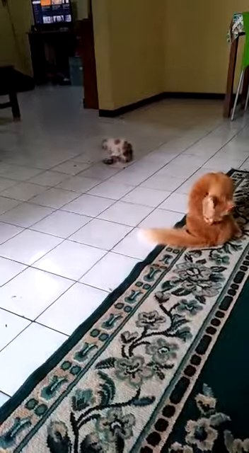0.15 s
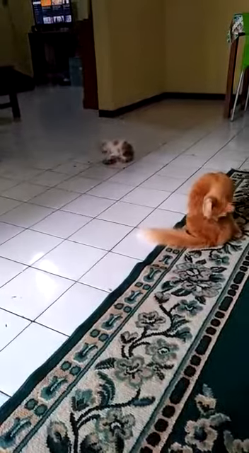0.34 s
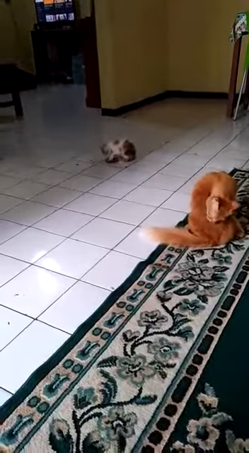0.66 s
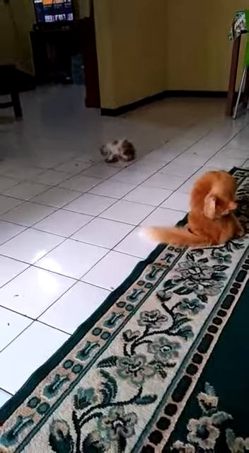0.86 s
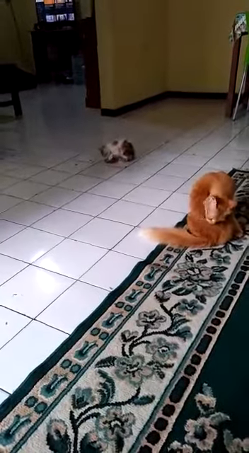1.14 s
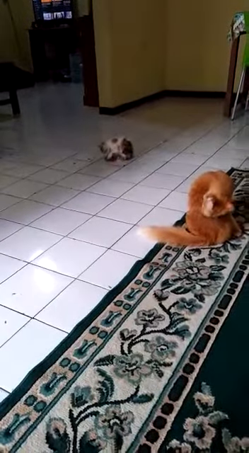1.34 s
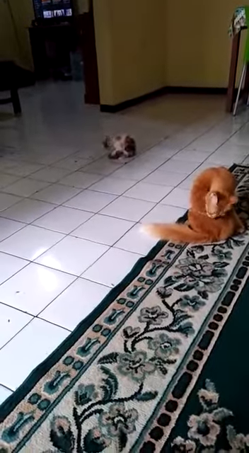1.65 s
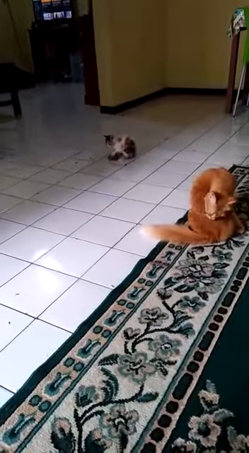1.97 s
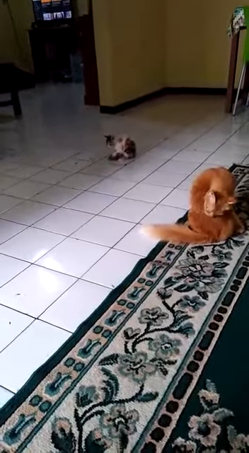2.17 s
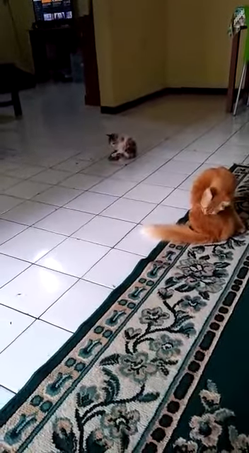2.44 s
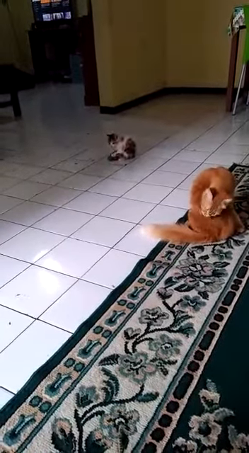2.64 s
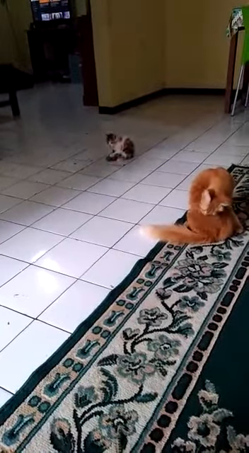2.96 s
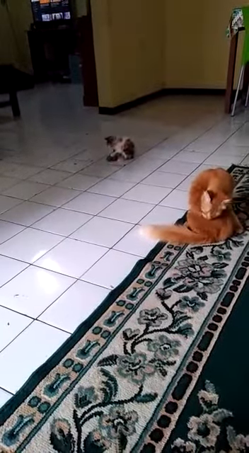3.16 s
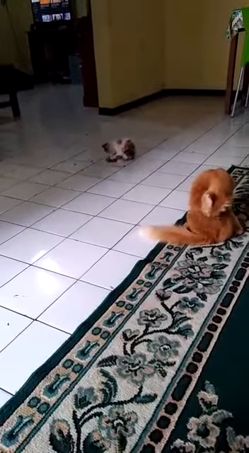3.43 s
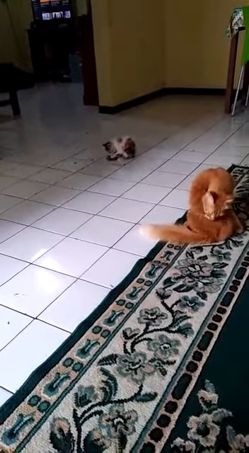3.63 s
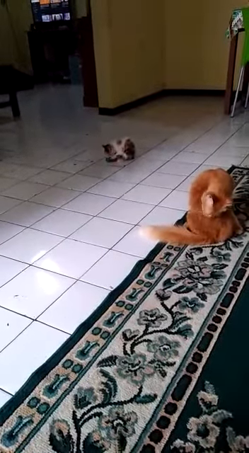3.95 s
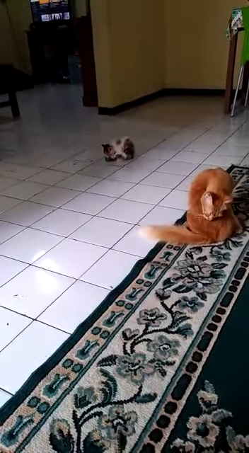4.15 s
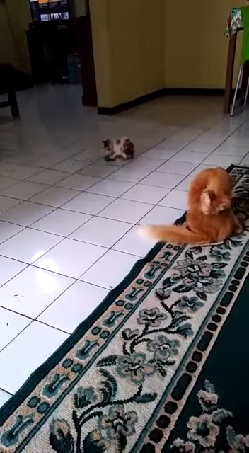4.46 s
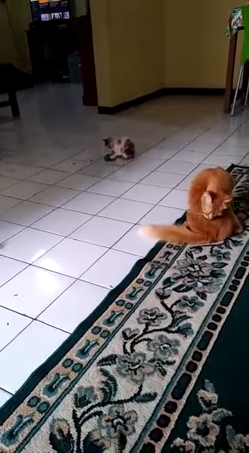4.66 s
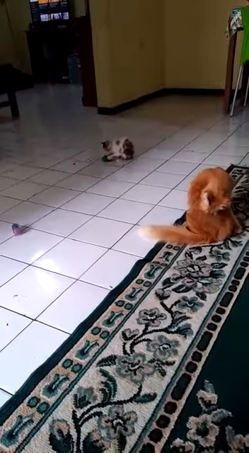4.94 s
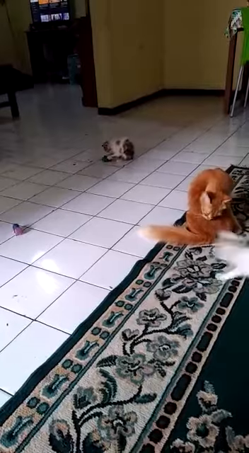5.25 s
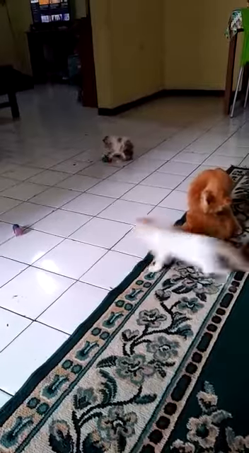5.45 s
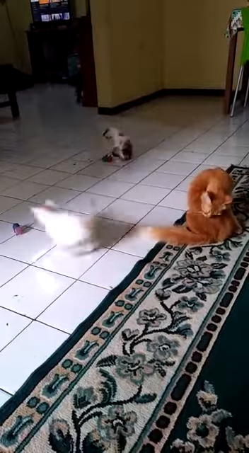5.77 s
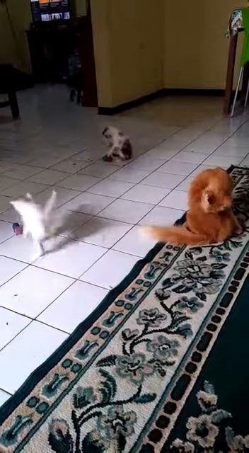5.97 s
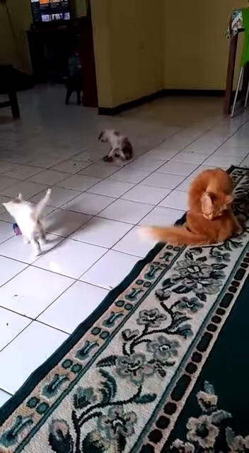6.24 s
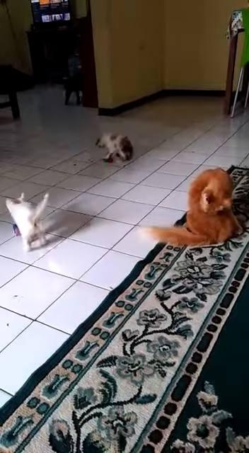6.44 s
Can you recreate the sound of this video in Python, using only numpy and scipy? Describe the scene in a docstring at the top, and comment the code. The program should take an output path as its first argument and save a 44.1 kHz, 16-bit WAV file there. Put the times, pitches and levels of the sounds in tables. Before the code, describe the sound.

A small plastic toy clicks like a ratchet about six times a second in an echoing tiled room, then rolls, jolting over grout lines, and stops.

```python
"""Tiled, echoing room: a small plastic toy car's ratchet clicks about six times a second, each click a
tick and clatter ringing broad body modes. It then rolls off, rubbing the tile and jolting over grout
lines; a paw scuffs it (swelling rubs), and a few faint rings sound. Low noise, a hum and room modes
rumble throughout. A suppressor lowers faint treble, so the echoes end early; steady hiss lies on top."""
import sys
import numpy as np
from scipy import signal
from scipy.fft import rfft, irfft
from scipy.io import wavfile
from scipy.ndimage import uniform_filter1d

SR = 44100
rng = np.random.default_rng(int(sys.argv[2]) if len(sys.argv) > 2 else 0)


def dump(signal):
    """Clip the signal to [-1, 1] and save it as 16-bit WAV at the path in sys.argv[1]."""
    limited = np.clip(np.atleast_2d(signal).T, -1, 1)
    pcm = np.round(limited * 32767).astype(np.int16)
    wavfile.write(sys.argv[1], SR, pcm)


N = 291060

# car body modes, in order thud, hollow, shell, edge, bright, top: (centre [Hz], width [Hz])
BODY_MODES = [(880, 714), (1750, 1253), (2900, 1136), (5100, 1560), (9200, 2500), (13000, 1300)]
# echo decay of each body mode: (time to fall 60 dB [s])
ECHO_T60_S = [0.36, 0.4, 0.37, 0.41, 0.34, 0.26]

# ratchet clicks: (time [s], peak [dB], hollow over bright [dB], shell [Hz], edge [Hz], echo over blow [dB])
CLICKS = [(0.4119, -49.5, -30.5, 3230, 3880, 7), (0.4275, -22, -15.5, 2570, 5730, 5.5),
          (0.5882, -30, -20, 2880, 6100, -5.5), (0.599, -38, -10.5, 3200, 5850, 9),
          (0.706, -35.5, -19.5, 2940, 6800, 0), (0.7204, -47, -34, 2670, 5880, 3),
          (0.9177, -56, -4, 2340, 5970, -0.5), (1.2095, -33, -13.5, 2950, 4700, 12.5),
          (1.3763, -22, -17.5, 2760, 4800, 1), (1.5451, -20.5, -14.5, 2620, 5700, 3.5),
          (1.6946, -18, -13.5, 3300, 4240, 3.5), (1.8662, -25, -15, 2660, 4700, 3),
          (2.0279, -31, -19.5, 3250, 5140, 1), (2.1888, -33.5, -18.5, 3480, 4070, 3.5),
          (2.3474, -29.5, -13, 3440, 4080, 7), (2.5086, -30, -18.5, 3310, 5750, 4),
          (2.637, -41.5, -34, 3400, 3670, -1), (2.7849, -34.5, -16.5, 2780, 4740, 9.5),
          (2.927, -24, -11, 2440, 5700, 3), (3.0959, -21.5, -9.5, 2460, 6530, 0.5),
          (3.2615, -21.5, -20.5, 2720, 5960, 1.5), (3.421, -20, -19, 2570, 6200, 3.5),
          (3.5626, -21, -12.5, 2900, 5900, -0.5), (4.0702, -32, -15, 2900, 5100, 10.5),
          (4.1227, -28.5, -11, 2490, 5170, 6), (6.2225, -60.5, -15.5, 3180, 5870, -6),
          (6.2602, -52.5, -5.5, 3040, 5090, 7)]
SHELL_DB, EDGE_DB, TOP_DB = -8, -11, -6  # modes over bright, for a click at HARD_DB
HARD_DB = -25
SOFT_SHELL, SOFT_EDGE, SOFT_TOP = 0.099, 0.12, -0.067  # dB gained per dB softer than HARD_DB
CLATTER_MIN, CLATTER_SPREAD = .42, .5  # loose-part taps against the first tick, before they die down

# wheels jolting over grout lines close by: (time [s], peak [dB], shell over bright [dB])
JOLTS = [(4.2092, -28.3, -11), (4.2154, -26.3, -14), (4.2274, -27.0, -18), (4.2526, -23.4, -13),
         (4.2577, -26.7, -19), (4.2771, -21.2, -11), (4.2821, -26.7, -10), (4.3349, -25.1, -10),
         (4.3539, -17.7, -14), (4.3577, -20.7, -14), (4.3675, -24.7, -8), (4.4086, -29.7, -3),
         (4.4367, -16.9, -9), (4.4402, -18.2, -18), (4.5353, -24.6, -19), (4.5385, -16.2, -10),
         (4.5496, -18, -26), (4.6536, -26.8, -17), (4.7966, -27.7, -9), (4.82, -31.8, -12)]
JOLT_SHELL_HZ, JOLT_DECAY_S = (2550, 3450), (.0007, .0022)  # random ranges
SMALL_JOLT_SPAN_S, SMALL_JOLT_OVER_ROLL_DB, SMALL_JOLT_SHELL_DB = (4.14, 4.96), 17, -6

# wheels rubbing the tile: (time [s], bright mode [dB], shell mode [dB])
ROLL = [(4.118, -81, -89), (4.132, -44.5, -51.5), (4.3, -50.5, -48), (4.47, -44.5, -59), (4.55, -55.5, -49),
        (4.62, -57, -57), (4.7, -56, -57), (4.77, -63.5, -65.5), (4.81, -54, -55.5), (5.0, -63, -58.5),
        (5.05, -72, -66.5), (5.161, -88, -87.5)]
# edge mode of the roll: (time [s], level over bright [dB])
ROLL_EDGE = [(4.118, -6.5), (4.3, -5.5), (4.5, -20), (4.62, -5), (4.72, 3), (4.85, -3), (5.0, -8.5),
             (5.16, -14)]
ROLL_HOLLOW_DB, ROLL_TOP_DB = -8.5, -7  # over bright at the start
ROLL_HOLLOW_FADE_DB_PER_S, ROLL_TOP_FADE_DB_PER_S = -11, -7.5  # against bright, as the car slows
ROLL_SHELL_MODE = 2950, 800  # centre, width [Hz]
RUB_BRIGHT_MODE = 8700, 2600  # centre, width [Hz]; roll and scuffs

# fur and claws on plastic and tile: (loudest time [s], rise [s], fall [s], bright [dB], shell over bright [dB])
SCUFFS = [(0.005, 0.0059, 0.061, -75, -14), (5.645, 0.022, 0.13, -66, -1), (6.05, 0.056, .05, -80, -16),
          (6.301, 0.086, 0.09, -65, 5.5), (6.571, 0.048, .3, -69, -8.5)]
SCUFF_ENDS_DB = -22.5  # ends against the top
SCUFF_HOLD = 0.17  # share of rise and fall spent at the top
SCUFF_HOLLOW_DB, SCUFF_EDGE_DB, SCUFF_TOP_DB = -11.5, -5.5, -6.5  # hollow, edge over shell; top over bright

# faint rings: (time [s], starting level [dB], centre [Hz], time to fall 60 dB [s], width [Hz])
PINGS = [(.273, -61, 1400, 0.28, 460), (.43, -49.5, 1630, 0.64, 220), (5.588, -67, 1940, 0.67, 240),
         (6.09, -77, 1980, 1.4, 66), (6.55, -67, 8900, 2.0, 300)]

# spectrum of the wide low noise: (frequency [Hz], relative density [dB])
RUMBLE_SPECTRUM = [(15, -38), (25, -12), (91, -13), (176, -8), (213, -45.5), (275, -11.5), (313, -34),
                   (468, -21.5), (644, -31), (747, -23.5), (1640, -30), (1940, -28), (4000, -54.5),
                   (5200, -79), (8800, -120)]
RUMBLE_RMS_DB = -72
# rumble above 350 Hz: (time [s], relative level [dB])
MID_SWELL = [(0, 5.5), (.4, 8), (0.8, 2), (2.2, 1), (2.4, 7.5), (2.8, 2), (6.6, 3)]
# hum and narrow room modes before the throb: (time [s], hum peak [dB], modes rms [dB])
BOOM = [(0.0, -59.5, -73), (0.24, -74, -77.5), (0.37, -57, -82.5), (0.59, -57, -77.5), (0.97, -73.5, -86.5),
        (1.36, -102, -68.5), (1.63, -88.5, -99), (1.91, -65, -77.5), (2.08, -75, -83.5), (2.52, -61, -70.5),
        (2.65, -75, -76.5), (2.85, -59, -73.5), (3.12, -65, -60), (3.64, -68.5, -71), (3.9, -64, -66),
        (4.58, -68.5, -83), (4.7, -63.5, -65.5), (5.07, -70, -69.5), (5.24, -56.5, -68.5), (5.39, -67, -88),
        (5.66, -65, -75), (6.6, -67, -96)]
HUM_HZ = 65
OCTAVE_DB = 3.5  # peak of the hum's octave over the narrow modes' level
# room modes, in order wide thudding, narrow, top: (centre [Hz], width [Hz])
ROOM_MODES = [(98, 85), (160, 16), (300, 40)]
THUD_FROM_HUM_DB, THUD_FROM_MODES_DB = -12.5, -4  # the wide mode rides on both
THUD_LATE_DB, LATE_S = -75, 5.2  # a steady share fades in from LATE_S
TOP_ROOM_MODE_DB = -10.5  # over the narrow mode

# hiss spectrum: (frequency [Hz], relative density [dB])
HISS_SPECTRUM = [(1180, -36), (2000, -13.5), (3280, -1.5), (3810, -11.5), (4840, -8), (8420, -11.5),
                 (14400, -13)]
HISS_MID_RMS_DB = -83.5
# treble roll-off: (frequency [Hz], gain [dB])
ROLL_OFF = [(100, 0), (14400, 0), (14650, -45), (16000, -50)]
# stereo width, raised by SIDE_DB in use: (frequency [Hz], side over mid [dB])
WIDE = [(3900, -67), (4600, -29), (6500, -5), (9000, 0.5), (15000, -2)]
SIDE_DB = 1.0
BAND_LIMIT_HZ = 15633


def gain_of(db):
    """dB to gain."""
    return 10 ** (np.asarray(db) / 20)


def evened(x):
    """Scales to rms 1."""
    return x / np.sqrt(np.mean(x ** 2) + 1e-20)


def read(points, hz):
    """Reads a spectrum table on a log-frequency axis."""
    f, value = np.transpose(points)
    return np.interp(np.log(hz + 1), np.log(f + 1), value)


def add(mix, start_s, sound):
    """Mixes a sound in at start_s, cut at the end of the mix."""
    part = mix[round(start_s * SR):][:len(sound)]
    part += sound[:len(part)]


def ring(x, hz, width_hz, order=2):
    """Band-pass resonance, scaled so that a unit tick comes out with energy near 1."""
    edges_hz = [hz - width_hz / 2, hz + width_hz / 2]
    sos = signal.butter(order, edges_hz, "bandpass", fs=SR, output="sos")
    return signal.sosfilt(sos, x) * np.sqrt(SR / 2 / width_hz)


def shaped(points, size, patchy_db):
    """Short-time spectra of coloured noise with smoothed random patches of level."""
    frames, hz = 4 * N // size + 5, np.fft.rfftfreq(size, 1 / SR)
    real, imag, patches = rng.standard_normal((frames, len(hz), 3)).T
    patches = uniform_filter1d(patches, size=6, axis=0)
    patches = evened(uniform_filter1d(patches, size=8, axis=1))
    level_db = read(points, hz)[:, None] + patchy_db * patches
    return hz, (real + 1j * imag) * gain_of(level_db)


def echoes(t, lumpy_db):
    """Dense reflections that build up within a few ms, one decay per body mode."""
    lumps = evened(uniform_filter1d(rng.standard_normal(len(t)), size=120))
    build_up = 1 - np.exp(-t / 0.011)
    dense = rng.standard_normal(len(t)) * gain_of(lumpy_db * lumps) * build_up
    tails = dense * gain_of(-60 * t / np.array(ECHO_T60_S)[:, None])
    return tails / np.linalg.norm(tails, axis=1, keepdims=True)


def strike(drives, pitches_hz, levels_db):
    """Rings each broad mode with its drive; a new comb of small panel modes roughens each blow's colour."""
    out = 0
    for drive, hz, db, (_, width_hz) in zip(drives, pitches_hz, levels_db, BODY_MODES):
        out = out + gain_of(db) * ring(drive, hz, width_hz)
    comb = evened(uniform_filter1d(rng.standard_normal(257), size=3))
    comb_hz = np.arange(257) * SR / 512
    depth_db = np.interp(comb_hz, (1500, 3000, 5500, 7000), (1.2, 2.6, 2.8, 1.3))
    # folded cepstrum: minimum-phase filter, no pre-ringing
    cepstrum = irfft(np.log(gain_of(depth_db * comb)))
    fold = np.r_[1, 2 * np.ones(255), 1, np.zeros(255)]
    causal = irfft(np.exp(rfft(cepstrum * fold)))
    return signal.oaconvolve(out, causal / np.linalg.norm(causal))


def click(peak_db, hollow_db, shell_hz, edge_hz, echo_db):
    """Ratchet: a tick, loose parts clattering within 47 ms, then the room; hollow blows thud the most."""
    t = np.arange(SR // 2) / SR
    tick = rng.choice([-1., 1.], len(t)) * np.exp(-t / .0014)
    for late, size in rng.random((8, 2)):
        burst = rng.standard_normal(300) * np.exp(-t[:300] / .0015)
        tap_gain = (CLATTER_MIN + CLATTER_SPREAD * size) * np.exp(-late)
        add(tick, .002 + .045 * late ** 2, tap_gain * burst)
    drives = tick / np.linalg.norm(tick) + gain_of(echo_db) * echoes(t, lumpy_db=0.0)
    thud, hollow, _, _, bright, top = [hz for hz, _ in BODY_MODES]
    pitches_hz = (thud, hollow, shell_hz, edge_hz, bright, top)
    softer_db = HARD_DB - peak_db
    shell_db = SHELL_DB + softer_db * SOFT_SHELL
    edge_db = EDGE_DB + softer_db * SOFT_EDGE
    top_db = TOP_DB + softer_db * SOFT_TOP
    thud_db = 2.3 * hollow_db + 6.5
    out = strike(drives, pitches_hz, (thud_db, hollow_db, shell_db, edge_db, 0, top_db))
    crest = 5.96  # assumed peak over the rms of the first 30 ms
    return gain_of(peak_db) * out / (crest * np.std(out[:1300]))


def jolt(peak_db, shell_db):
    """Wheel on a grout line: one dry snap of a few ms; close by, so the echoes are weak."""
    t = np.arange(SR // 2) / SR
    shell_hz = rng.uniform(*JOLT_SHELL_HZ)
    decay_s = np.exp(rng.uniform(*np.log(JOLT_DECAY_S)))
    snap = rng.choice([-1., 1.], len(t)) * np.exp(-t / decay_s) * (t < 2 * decay_s)
    echo_db = [[-4], [-4], [-5], [-5], [-7], [-13]]  # per mode
    drives = snap / np.linalg.norm(snap) + gain_of(echo_db) * echoes(t, lumpy_db=0.0)
    pitches_hz = [hz for hz, _ in BODY_MODES]
    pitches_hz[2] = shell_hz
    # a narrower mode needs more energy for the same peak
    narrow_db = 10 * np.log10(BODY_MODES[4][1] / BODY_MODES[2][1])
    out = strike(drives, pitches_hz, (-34, -26, shell_db + narrow_db, -11, 0, -8))
    return gain_of(peak_db) * out / abs(out[:200]).max()


def rub(s, levels_db, shell_mode, bumps_per_s, spread_db, blur):
    """Many tiny bumps of uneven size, blurred by the room, ring the upper five modes; returns start, sound."""
    t = np.arange(s[0], s[-1], 1 / SR)
    sizes = gain_of(spread_db * np.minimum(rng.exponential(1, len(t)), 4))
    bumps = sizes * (rng.random(len(t)) < bumps_per_s / SR)
    drive = evened(bumps * rng.standard_normal(len(t))) + blur * rng.standard_normal(len(t))
    # the colour shifts as the contact moves
    drifts_db = [2.2 * evened(v) for v in uniform_filter1d(rng.standard_normal((5, len(t))), size=700)]
    modes = (BODY_MODES[1], shell_mode, BODY_MODES[3], RUB_BRIGHT_MODE, BODY_MODES[5])
    out = np.zeros(len(t))
    for mode, db, drift_db in zip(modes, levels_db, drifts_db):
        out += gain_of(np.interp(t, s, db) + drift_db) * evened(ring(drive, *mode))
    return s[0], out * signal.windows.tukey(len(t), .02)


def roll():
    """Wheels rub the tile; hollow and top modes sink as the car slows, the edge mode comes and goes."""
    s, bright_db, shell_db = np.transpose(ROLL)
    elapsed_s = s - s[0]
    hollow_db = bright_db + ROLL_HOLLOW_DB + ROLL_HOLLOW_FADE_DB_PER_S * elapsed_s
    top_db = bright_db + ROLL_TOP_DB + ROLL_TOP_FADE_DB_PER_S * elapsed_s
    edge_db = bright_db + np.interp(s, *np.transpose(ROLL_EDGE))
    levels_db = (hollow_db, shell_db, edge_db, bright_db, top_db)
    return rub(s, levels_db, ROLL_SHELL_MODE, bumps_per_s=1500, spread_db=3.0, blur=.8)


def scuff(top_s, rise_s, fall_s, bright_db, body_db):
    """Paw: one brushing stroke of dense bumps that swells and fades."""
    offsets_s = np.array([-rise_s, -SCUFF_HOLD * rise_s, SCUFF_HOLD * fall_s, fall_s])
    s = np.maximum(top_s + offsets_s, 0)
    bright = bright_db + SCUFF_ENDS_DB * np.array([1, 0, 0, 1])
    shell = bright + body_db
    levels_db = (shell + SCUFF_HOLLOW_DB, shell, shell + SCUFF_EDGE_DB, bright, bright + SCUFF_TOP_DB)
    return rub(s, levels_db, BODY_MODES[2], bumps_per_s=3000, spread_db=1.0, blur=0.95)


def ping(db, hz, t60_s, width_hz):
    """Faint ring: narrow-band noise dying away, faded out within 1/8 s."""
    t = np.arange(SR // 8) / SR
    shake = evened(ring(rng.standard_normal(len(t)), hz, width_hz))
    return gain_of(db - 60 * t / t60_s) * shake * np.cos(np.pi / 2 * t / t[-1]) ** .5


def rumble():
    """Wide low noise; a wavering hum and low room modes, on separate level curves, under one shared throb."""
    hz, z = shaped(RUMBLE_SPECTRUM, size=2048, patchy_db=1.5)
    frame_s = np.arange(z.shape[1]) * 512 / SR
    z[hz > 350] *= gain_of(np.interp(frame_s, *np.transpose(MID_SWELL)))
    noise = evened(signal.istft(z, nperseg=2048, noverlap=1536)[1][:N])
    s, *levels_db = np.transpose(BOOM)
    t = np.arange(N) / SR
    hum, narrow = (gain_of(np.interp(t, s, db)) for db in levels_db)
    wide = gain_of(THUD_FROM_HUM_DB) * hum + gain_of(THUD_FROM_MODES_DB) * narrow
    wide += gain_of(THUD_LATE_DB) * np.clip((t - LATE_S) / 0.35, 0, 1)
    slow = uniform_filter1d(uniform_filter1d(rng.standard_normal((2, N)), size=2000), size=2000)
    waver, throb = (evened(v) for v in slow)
    phase = 2 * np.pi * np.cumsum(HUM_HZ + 1.5 * waver) / SR
    low = hum * np.sin(phase) + gain_of(OCTAVE_DB) * narrow * np.sin(2 * phase)
    for mode, level in zip(ROOM_MODES, (wide, narrow, gain_of(TOP_ROOM_MODE_DB) * narrow)):
        low += level * evened(ring(rng.standard_normal(N), *mode))
    return gain_of(RUMBLE_RMS_DB) * noise + low * gain_of(1.6 * throb)


def scene():
    """Clicks, jolts, roll, scuffs and rings over the rumble, alike in both channels."""
    toy = np.zeros(N)
    for s, *row in CLICKS:
        add(toy, s, click(*row))
    for s, *row in JOLTS:
        add(toy, s, jolt(*row))
    roll_s, roll_db, _ = np.transpose(ROLL)
    for s in rng.uniform(*SMALL_JOLT_SPAN_S, size=24):
        peak_db = np.interp(s, roll_s, roll_db) + SMALL_JOLT_OVER_ROLL_DB
        add(toy, s, jolt(peak_db, SMALL_JOLT_SHELL_DB))
    add(toy, *roll())
    for row in SCUFFS:
        add(toy, *scuff(*row))
    for s, *row in PINGS:
        add(toy, s, ping(*row))
    return np.tile(toy + rumble(), (2, 1))


def record(dry):
    """A suppressor lowers faint treble, hiss joins, the treble spreads in patches, then the band limit."""
    hz, _, z = signal.stft(dry.mean(0), SR, nperseg=256, noverlap=192)
    power = uniform_filter1d(uniform_filter1d(abs(z) ** 2, size=25, axis=0), size=15, axis=1)
    under_db = np.clip(-88 - 10 * np.log10(power + 1e-16), 0, 25)
    treble = np.clip((hz[:, None] - 1200) / 1500, 0, 1)
    z = z * gain_of(-.9 * under_db * treble + read(ROLL_OFF, hz)[:, None])

    _, hiss = shaped(HISS_SPECTRUM + [(14700, -55.5)], size=256, patchy_db=0.9)
    hiss = hiss[:, :z.shape[1]]
    # 85: bin power to signal power for this window
    z = z + gain_of(HISS_MID_RMS_DB) * hiss / np.sqrt(np.mean(abs(hiss) ** 2) * 85)

    patches = uniform_filter1d(rng.standard_normal(z.shape), size=12, axis=0)
    patches = uniform_filter1d(patches, size=40, axis=1)
    turn = np.exp(2j * np.pi * rng.random(z.shape))  # same colour, unrelated phase
    side = z * turn * gain_of(read(WIDE, hz)[:, None] + SIDE_DB) * (evened(patches) > -.2)
    out = signal.istft(np.array([z + side, z - side]), nperseg=256, noverlap=192)[1][:, :N]
    low_pass = signal.firwin(511, BAND_LIMIT_HZ, window=("kaiser", 9), fs=SR)
    return signal.oaconvolve(out, low_pass[None], "same")


dry = scene()
out = record(dry)
dump(out)
```